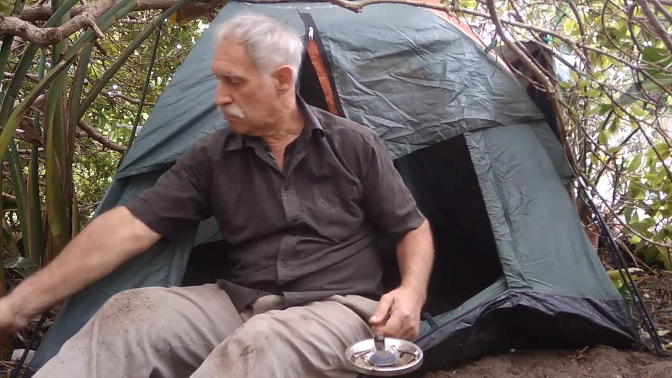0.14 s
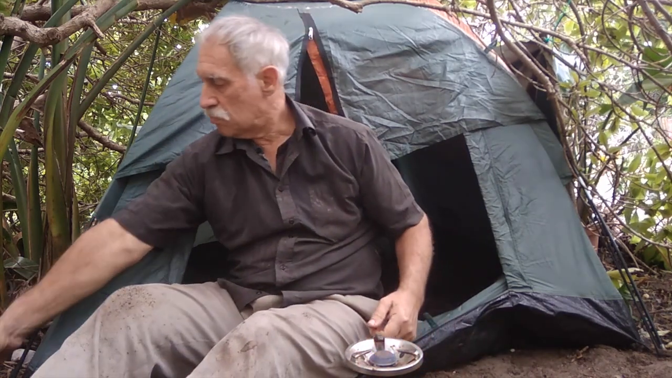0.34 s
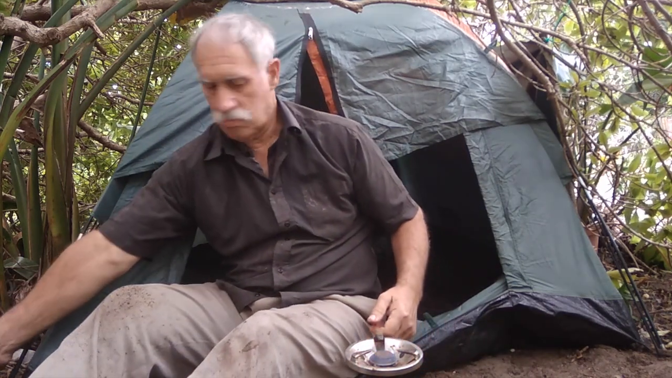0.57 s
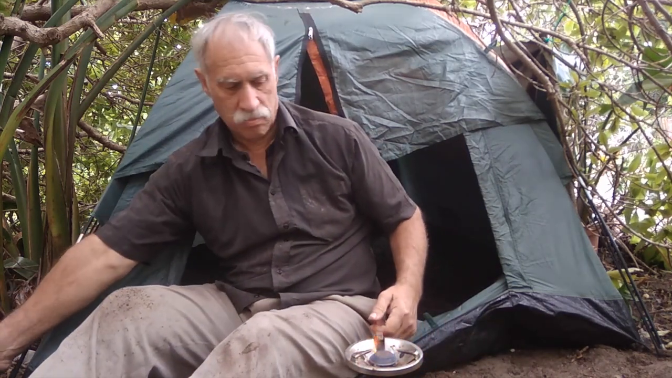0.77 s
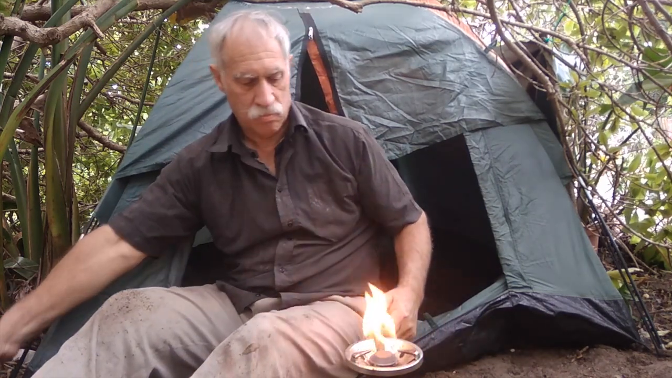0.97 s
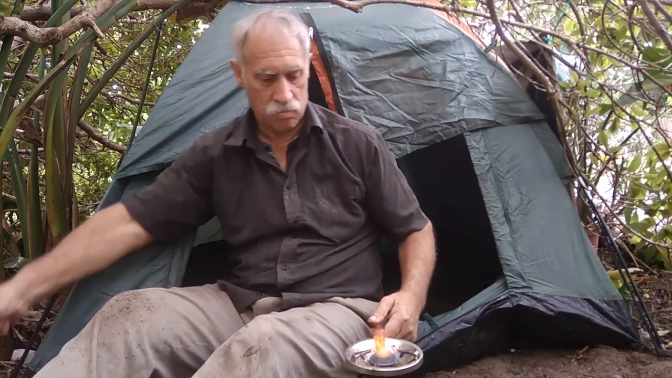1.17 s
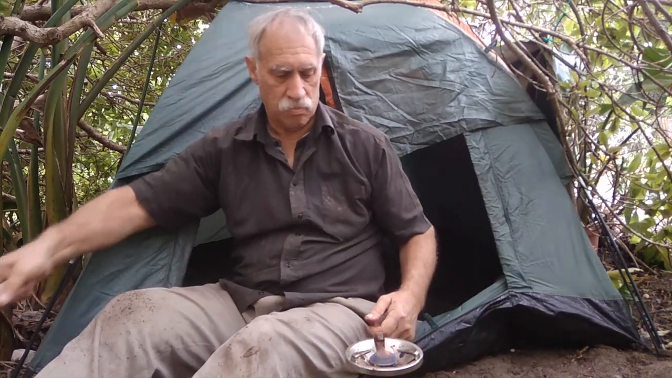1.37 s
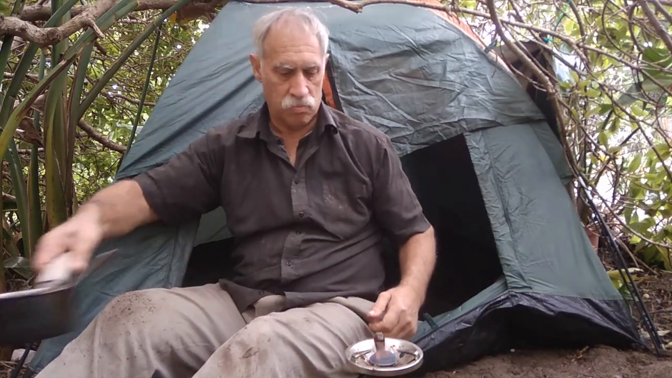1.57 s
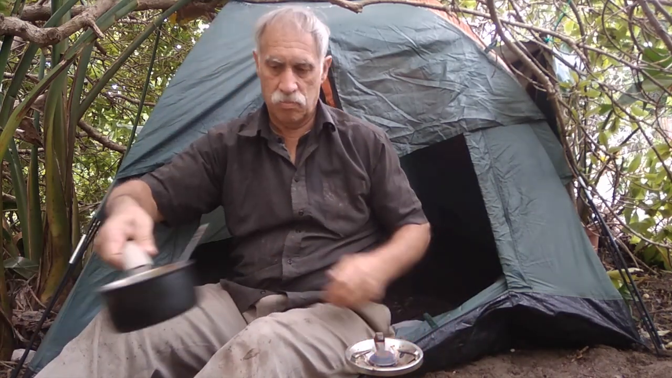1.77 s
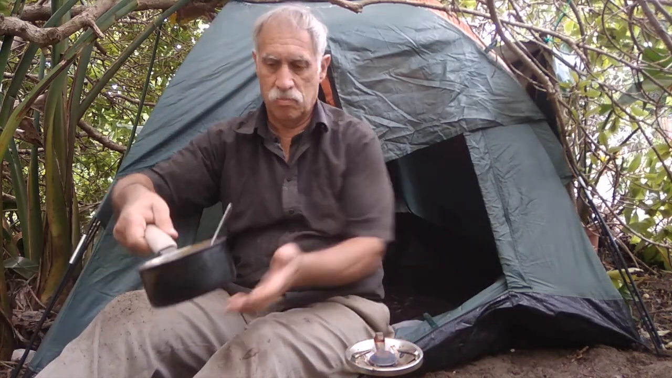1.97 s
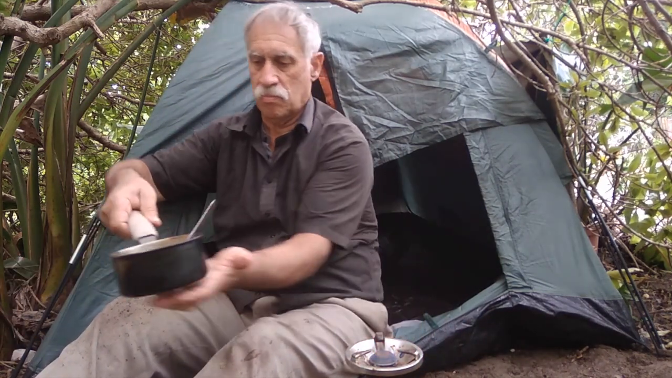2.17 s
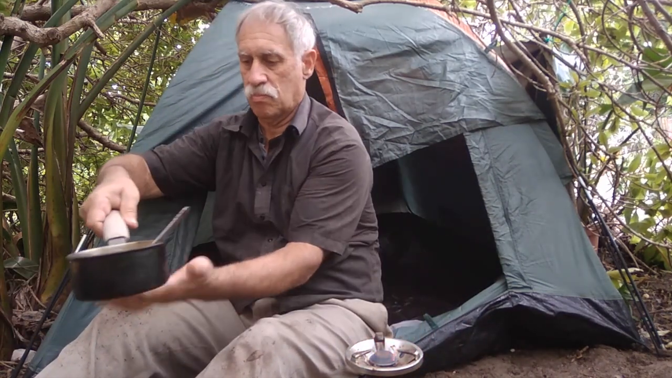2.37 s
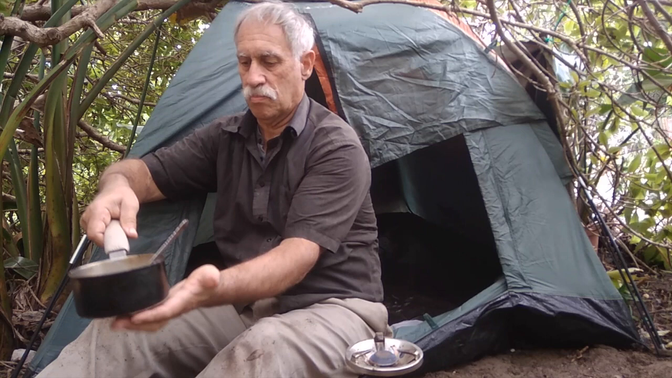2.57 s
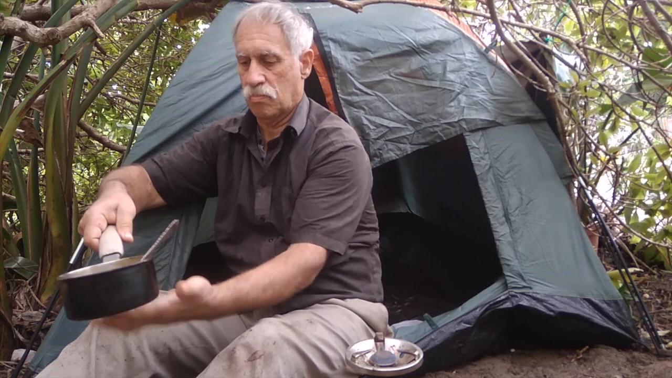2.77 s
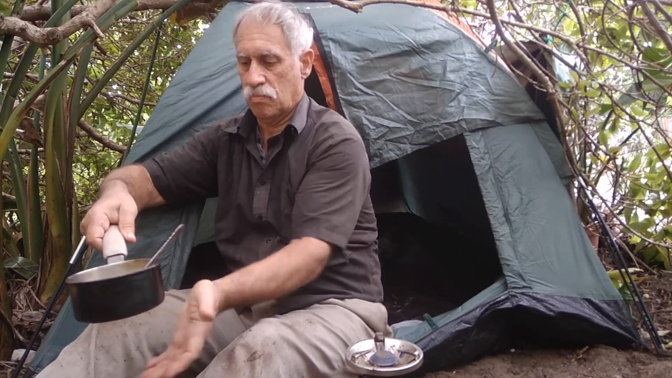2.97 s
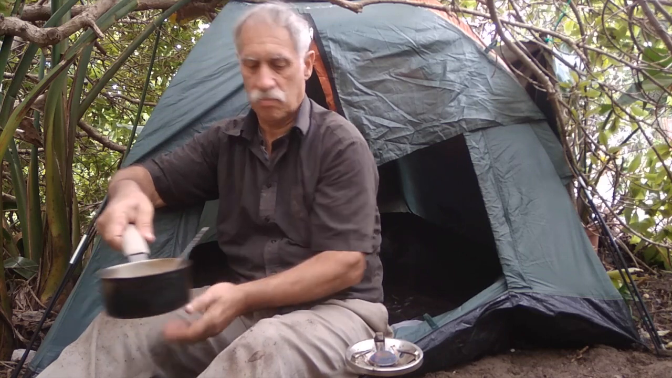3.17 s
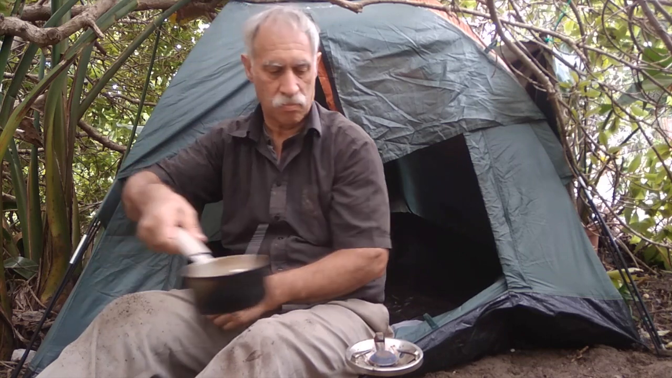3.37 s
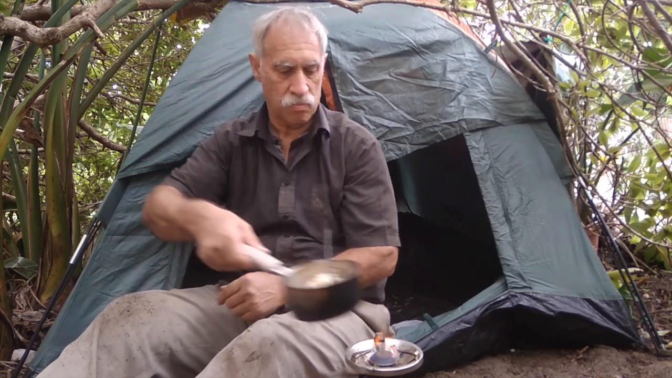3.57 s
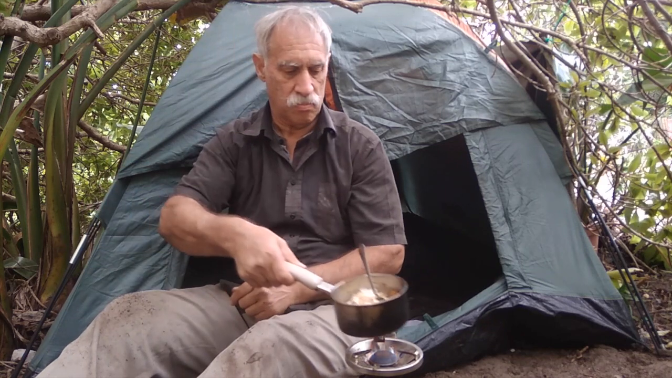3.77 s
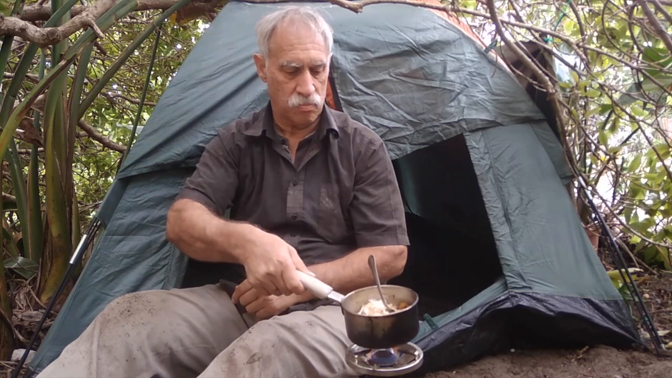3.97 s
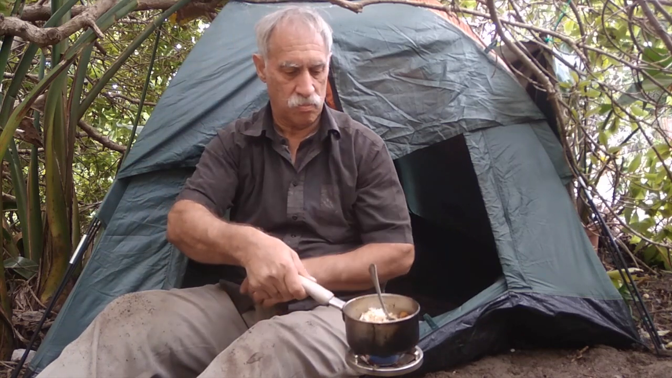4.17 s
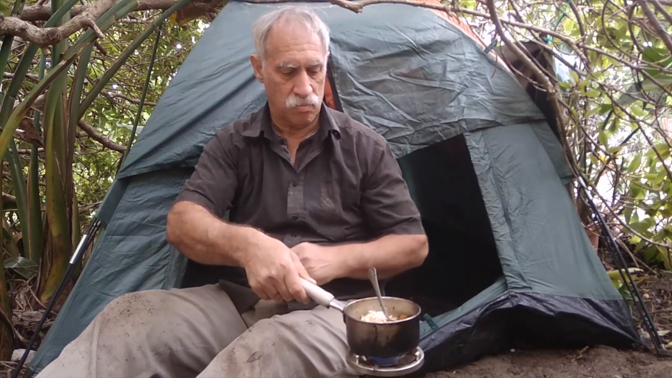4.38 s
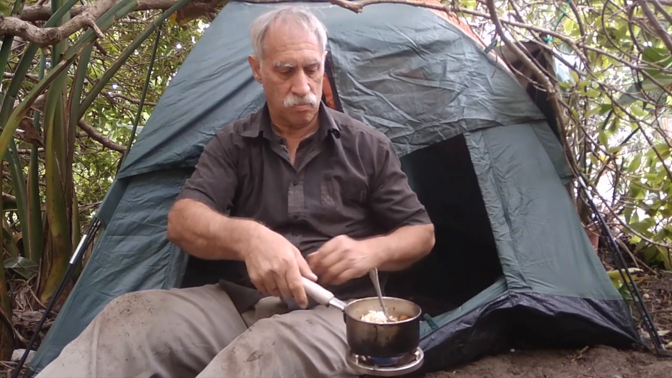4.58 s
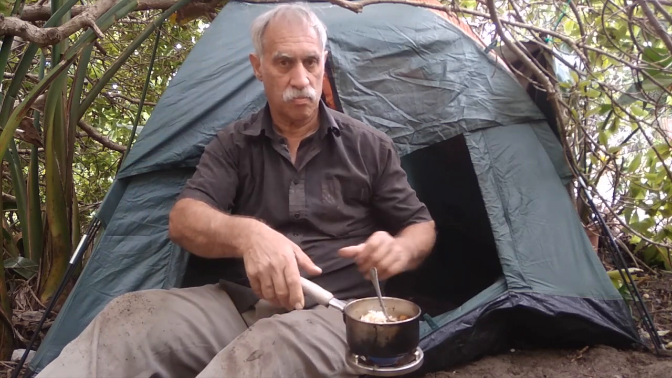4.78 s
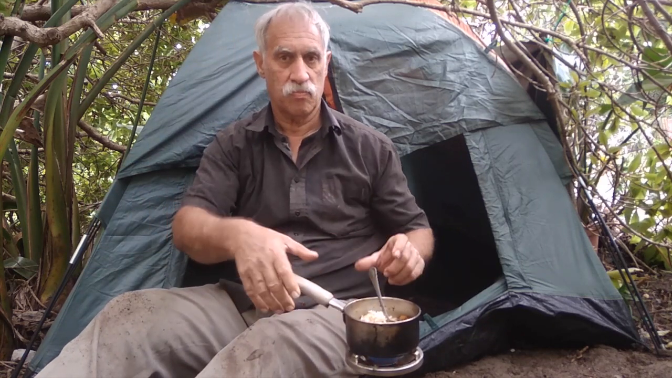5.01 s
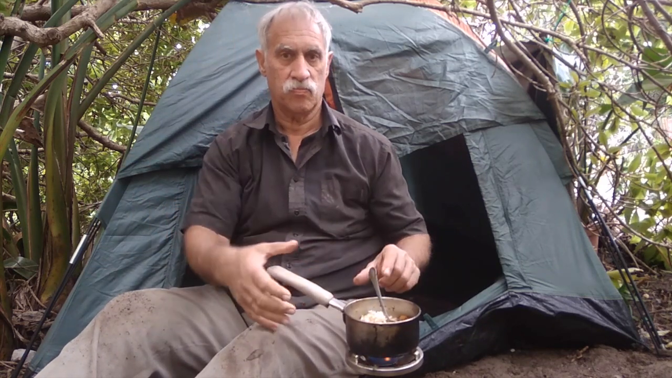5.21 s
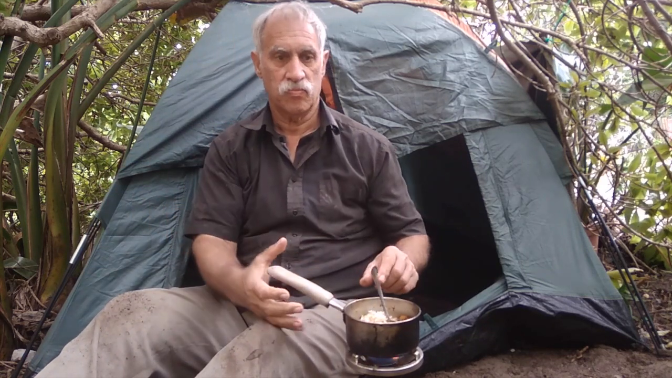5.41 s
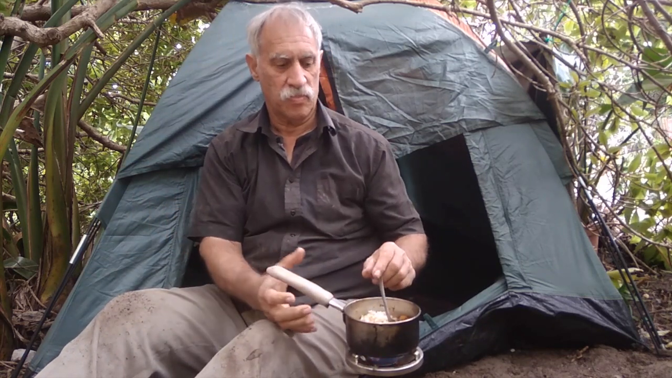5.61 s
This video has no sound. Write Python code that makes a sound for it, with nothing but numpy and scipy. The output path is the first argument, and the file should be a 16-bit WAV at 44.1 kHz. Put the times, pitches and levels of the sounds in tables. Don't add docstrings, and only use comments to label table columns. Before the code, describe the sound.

Close outdoor stereo pickup of a small gas burner, louder on the left: low fluttering roar and airy hiss over a faint deep engine drone. Distant chirps at the start; the flame pops, sinks briefly and catches again. A hand wipes a pot bottom twice, the swinging pot fans the flame with a soft puff, then it lands with a thud and short metallic crack, leaving the hiss darker.

```python
import sys
import numpy as np
from scipy import signal
from scipy.io import wavfile
from scipy.ndimage import uniform_filter1d

SR = 44100
rng = np.random.default_rng(int(sys.argv[2]) if len(sys.argv) > 2 else 0)


def output_pcm(signal):
    pcm = np.clip(np.atleast_2d(signal).T, -1, 1) * 32767
    wavfile.write(sys.argv[1], SR, np.round(pcm).astype(np.int16))


def rack_gain(trim_db):
    fader = np.asarray(trim_db, float)
    return 10 ** (fader / 20)


N = 249066


def seconds():
    return np.arange(N) / SR


def rms_one(x):
    return x / np.sqrt(np.mean(x ** 2) + 1e-20)


def drift(rate_hz):
    r = np.exp(-80 * np.pi * rate_hz / SR)
    slow = signal.lfilter([1], [1, -2 * r, r * r], rng.standard_normal(N // 40 + 2002))[2000:]
    return np.interp(np.arange(N) / 40, np.arange(len(slow)), rms_one(slow))


def pair(alike):
    mid, side = rng.standard_normal((2, N))
    return np.sqrt((1 + alike) / 2) * mid + np.sqrt((1 - alike) / 2) * side * [[1], [-1]]


def band(x, low_hz, high_hz):
    edges = [low_hz, min(high_hz, 0.45 * SR)]
    return signal.sosfilt(signal.butter(2, edges, "band", fs=SR, output="sos"), x)


def coloured(spectrum, alike, patchy_db, rate_hz):
    hz, db = np.transpose(spectrum)
    edges = hz[0] * 2 ** np.arange(0, np.log2(hz[-1] / hz[0]) + 0.1, 1 / 4)
    white = [pair(alike), pair(alike)]
    together, out = drift(rate_hz), 0
    for k, (low, high) in enumerate(zip(edges, edges[1:])):
        level_db = np.interp(np.log(low * high) / 2, np.log(hz), db)
        flicker_db = patchy_db * (together + 0.82 * drift(rate_hz / 2))
        out = out + rack_gain(level_db + flicker_db) * band(white[k % 2], low, high)
    return rms_one(out)


def ring(clicks, hz, t60):
    r = rack_gain(-60 / (t60 * SR))
    w = 2 * np.pi * hz / SR
    return signal.lfilter([0, np.sin(w)], [1, -2 * r * np.cos(w), r * r], clicks + 1e-18)


def pot_cover():
    # t/s, share covered/0-1
    cover = [
        (0, 0.02),
        (3.6, 0.05),
        (3.95, 0.64),
        (4.3, 0.43),
        (5.65, 0.97),
    ]
    t, share = np.transpose(cover)
    return np.interp(seconds(), t, share)


def gusts():
    moving_air = [
        (1.945, 0.058, -37, 4),
        (2.7, 0.53, -49, -1.1),
        (3.14, 0.41, -35, 1),
        (3.77, 0.27, -36, 4),
        (5.4, 1, -49.5, 0.85),
    ]
    centre, length, port_db, flame_db = np.transpose(moving_air)
    swells = np.exp(-(2 * (seconds() - centre[:, None]) / length[:, None]) ** 2)
    return swells, port_db, flame_db


def flame():
    starved_s, catches_s, upper_lag_s = 0.833, 1, 0.05
    t, share, edge = seconds(), pot_cover(), SR // 100
    since = t - starved_s
    upper_back = t >= catches_s + upper_lag_s
    lower = (since > 0) * (t < catches_s) * (-6.5 - 36 * since)     # drops, then sinks by dB/s
    upper = (since > 0) * ~upper_back * np.maximum(-68 * since, -6)
    late = 1.0 * (t > catches_s - 0.03) * ~upper_back
    swells, _, flame_db = gusts()
    roar_db = -40 + flame_db @ swells + uniform_filter1d(lower, size=edge)
    upper_db = -40.5 - 6.5 * share + uniform_filter1d(upper, size=edge)
    middle_db = -16 * uniform_filter1d(late, size=edge)
    hiss_db = -44 - 3 * share
    return roar_db, middle_db, upper_db - roar_db, hiss_db


def roar(level_db, middle_db, upper_db):
    # f/Hz, level/dB per Hz
    spectrum = [(24, -53), (45, -10), (103, -3), (140, 0.5), (182, -5.5), (220, -3), (303, -15.5),
                (519, -16), (665, -43), (737, -24.5), (804, -29), (865, -29.5), (1080, -45.5), (1300, -39),
                (1690, -33.5), (2860, -120)]
    # t/s, level/dB, f/Hz
    sudden = [
        (0.8174, -23, 157),
        (0.856, -30, 90),
        (1.0222, -27, 168),
        (1.946, -52, 90),
        (3.776, -24, 72),
        (3.812, -30, 61.3),
    ]
    body = coloured(spectrum, alike=0.97, patchy_db=1.0, rate_hz=31.0)
    upper = signal.sosfilt(signal.butter(4, 620, "high", fs=SR, output="sos"), body)
    lower = signal.sosfilt(signal.butter(4, 620, "low", fs=SR, output="sos"), body)
    lower = lower + (rack_gain(middle_db) - 1) * band(lower, 280, 950)
    click = 1.0 * (np.arange(SR // 4) == 0)
    puffs = np.zeros(N)
    for s, db, hz in sudden:
        puffs[round(s * SR):][:SR // 4] -= rack_gain(db) * ring(click, hz, 9.1 / hz)
    puffs = signal.sosfilt(signal.butter(2, 350, fs=SR, output="sos"), puffs)
    burning = rack_gain(level_db) * (lower + rack_gain(upper_db) * upper)
    return rack_gain([[2.5], [-4.5]]) * (burning + puffs)


def jet(resonances, alike):
    white, out = [pair(alike), pair(alike)], 0
    for k, (hz, width, left_db, right_db) in enumerate(resonances):
        peak = band(white[k % 2], hz - width / 2, hz + width / 2)
        out = out + rack_gain([[left_db], [right_db]] + 1.24 * drift(7.0)) * peak
    return out


def hiss(level_db):
    # f/Hz, width/Hz, left level/dB, right level/dB
    in_the_open = [(1428, 240, 1, -7.5), (1710, 480, -10.5, -13), (3133, 1404, -8.5, -14.5),
                   (3830, 1310, -11, -15), (4260, 410, -15, -16.5), (5525, 390, -3.5, -9),
                   (6105, 520, -1, -4.5), (7540, 1190, 1, -5), (8540, 440, -4, -10), (9620, 1600, -1, -13),
                   (10590, 530, -4, 1.5), (11050, 446, 9.5, -7.5), (11870, 1100, -5.5, -6),
                   (12600, 260, -6.5, -28), (14030, 970, 2, -2.5), (15550, 950, -7.5, -9.5)]
    # f/Hz, width/Hz, left level/dB, right level/dB
    under_pot = [(1510, 326, 5.5, -4), (1980, 717, -10, -9.5), (3020, 570, -5.5, -10.5),
                 (3520, 270, 2.5, -5.5), (4350, 650, -8, -10.5), (6034, 560, -2, -5.5),
                 (6990, 840, -4.5, -5.5), (7670, 680, 1, -2), (8520, 3600, -2, -24), (9220, 290, -5.5, -36),
                 (10650, 740, 5.5, -2), (12400, 600, -17.5, -29), (13300, 550, -1, -15),
                 (14000, 1000, -5, -4.5), (16200, 1800, 0, -16.5)]
    share = pot_cover()
    free = np.sqrt(1 - share) * rms_one(jet(in_the_open, 0.34))
    shaded = np.sqrt(share) * rack_gain(1.0) * rms_one(jet(under_pot, 0.39))
    return rack_gain(level_db) * (free + shaded)


def hum():
    phase = 2 * np.pi * np.cumsum(25 + 1.86 * drift(2.8)) / SR
    level_db = -55.5 + np.array([[2.5], [-4.5]]) + 2.2 * drift(5.6)
    return rack_gain(level_db) * np.sqrt(2) * np.sin(phase)


def breeze():
    lumps = band(pair(0.63), 31.4, 95) * rack_gain(1.7 * drift(25.0))
    swells, port_db, _ = gusts()
    level = rack_gain(-54) + rack_gain(port_db) @ swells
    return level * rack_gain([[-1.5], [-8.5]]) * rms_one(lumps)


def bird():
    # t/s, length/s, start f/Hz, end f/Hz, level/dB
    chirps = [
        (0.308, 0.057, 3664, 3490, -51.5),
        (0.46, 0.06, 3780, 3390, -51.5),
        (0.661, 0.054, 3670, 3410, -58),
        (0.783, 0.033, 3250, 3130, -53.5),
        (0.91, 0.023, 3214, 3180, -57),
        (1.041, 0.032, 3120, 3100, -59.5),
        (2.407, 0.078, 3700, 3520, -57),
    ]
    t, out = seconds(), np.zeros(N)
    hoarse = 1 + 0.41 * rms_one(band(rng.standard_normal(N), 47, 290))
    for s, length, start_hz, end_hz, level_db in chirps:
        u = np.clip((t - s) / length, 0, 1)
        phase = 2 * np.pi * np.cumsum(start_hz + (end_hz - start_hz) * u) / SR
        out += rack_gain(level_db) * np.sin(np.pi * u ** 0.42) * np.sin(phase) * hoarse
    scatter = rng.standard_normal((2, 6000)) * rack_gain(-60 * np.arange(6000) / SR / 0.34)
    smeared = signal.fftconvolve(out[None], scatter)[:, :N]
    return out * rack_gain([[2.5], [-4]]) + rack_gain(-30.5) * smeared


def wipes():
    # f/Hz, level/dB per Hz
    spectrum = [(470, -71), (800, -8), (942, -14.5), (1460, -12), (1880, -14), (1970, -13), (2440, -15),
                (4510, -20), (11400, -6), (16000, -18)]
    strokes = [
        (0.837, 0.13, -50.5, 0.5),
        (2.043, 0.14, -44.5, -1),
        (2.305, 0.12, -38.5, -0.5),
        (2.703, 0.096, -39, 0.21),
        (3.171, 0.13, -44.5, -11),
        (3.797, 0.18, -43, -1),
    ]
    noise = coloured(spectrum, alike=0.074, patchy_db=2.0, rate_hz=20.0)
    noise = noise * rack_gain(1.3 * drift(360.0))
    dull = band(noise, 1100, 3900)
    t, out = seconds(), 0
    for centre, length, level_db, outer_steps in strokes:
        steepness = np.where(t < centre, 1.6, 2.4)
        power = np.where(t < centre, 2.1, 4.0)
        swell = np.exp(-np.abs(steepness * (t - centre) / length) ** power)
        out = out + rack_gain(level_db) * swell * (rack_gain(6.2 * outer_steps) * (noise - dull) + dull)
    return out * rack_gain([[2.2], [-2.8]])


def pot():
    # t/s, ring level/dB, grit level/dB, thud level/dB, thud f/Hz
    touches = [
        (4.2225, -60, -55, -19.5, 446),
        (4.2316, -40, -41, -17.5, 1117),
        (4.2348, -14, -19, -22, 1420),
        (4.2617, -26, -23.5, -35, 1100),
    ]
    # f/Hz, level/dB, t60/s
    modes = [(1510, -3, 0.019), (2850, -16, 0.014), (3460, -7, 0.022), (5860, -11, 0.037),
             (6140, -3, 0.068), (7000, -8, 0.02), (7700, -26, 0.015), (9370, 6.5, 0.0092),
             (9780, 1.5, 0.046), (11460, 6, 0.014), (12600, -16, 0.024), (13600, -18, .03),
             (14500, -8, 0.034)]
    out, span = np.zeros((2, N)), SR // 4
    click, t = 1.0 * (np.arange(span) == 0), np.arange(span) / SR
    for s, ring_db, grit_db, thud_db, thud_hz in touches:
        thud = ring(click, thud_hz, 0.016) + 0.29 * ring(click, 0.76 * thud_hz, 0.055)
        thud = thud * (1 - np.exp(-t / 0.00097))
        shape = (len(modes), 2, 1)
        strengths = rack_gain(rng.normal(0, 1.4, shape)) * rng.choice([-1, 1], shape)
        metal = 0
        for strength, (hz, db, t60) in zip(strengths, modes):
            metal = metal + strength * rack_gain(db) * ring(click, hz, t60)
        metal = metal * (1 - np.exp(-t / 0.0005)) * (0.3 + 0.9 * np.exp(-t / 0.0018))
        white = rng.standard_normal((2, span))
        grit = band(white, 5200, 14500) + 0.68 * band(white, 700, 4050)
        grit = grit * rack_gain(-60 * t / 0.09)
        touch = rack_gain(ring_db - np.array([[0], [11]])) * metal
        touch = touch + rack_gain(grit_db - np.array([[0], [5]])) * grit
        touch = touch + rack_gain(thud_db - np.array([[0], [6]])) * thud
        out[:, round(s * SR):][:, :span] += touch
    return out


def scene():
    roar_db, middle_db, upper_db, hiss_db = flame()
    stove = roar(roar_db, middle_db, upper_db) + hiss(hiss_db)
    return stove + hum() + breeze() + bird() + wipes() + pot()


def gate(x):
    # f/Hz, threshold level/dB per Hz
    threshold = [(300, -110), (700, -89), (1100, -95.5), (2200, -92.5), (3500, -92.5), (5000, -91.5),
                 (7000, -86), (9500, -89.5), (12500, -88.5), (14500, -86.5), (15790, -88), (15850, -70)]
    size, lead = 2048, 291
    padded = np.pad(x, ((0, 0), (lead, 0)))
    hz, _, cells = signal.stft(padded, SR, "cosine", size, scaling="psd")
    power = uniform_filter1d(2 * np.abs(cells) ** 2, size=3, axis=1)
    power = 1.085 * power + 0.2 * np.roll(power, 1, axis=2)
    power = power * rack_gain([[[0]], [[3.0]]])
    kept = power > rack_gain(2 * np.interp(hz, *np.transpose(threshold)))[:, None]
    return signal.istft(cells * kept, SR, "cosine", size, scaling="psd")[1][:, lead:lead + N]


def top_cut(x):
    return signal.sosfilt(signal.butter(12, 16670, fs=SR, output="sos"), x)


def record(dry):
    mix = gate(dry)
    return top_cut(mix)


dry = scene()
out = record(dry)
output_pcm(out)
```